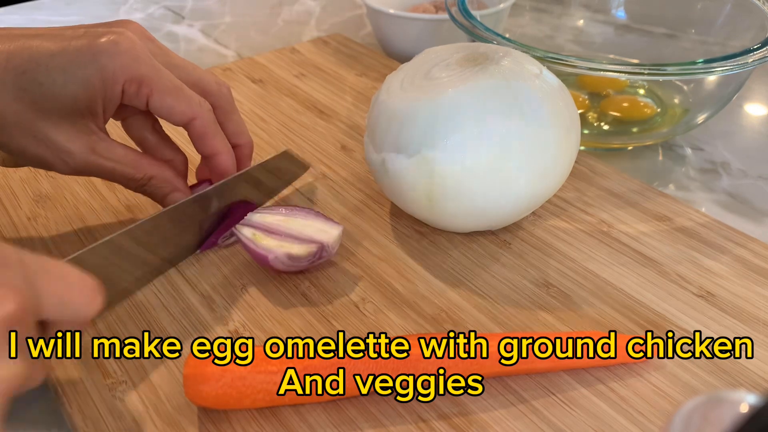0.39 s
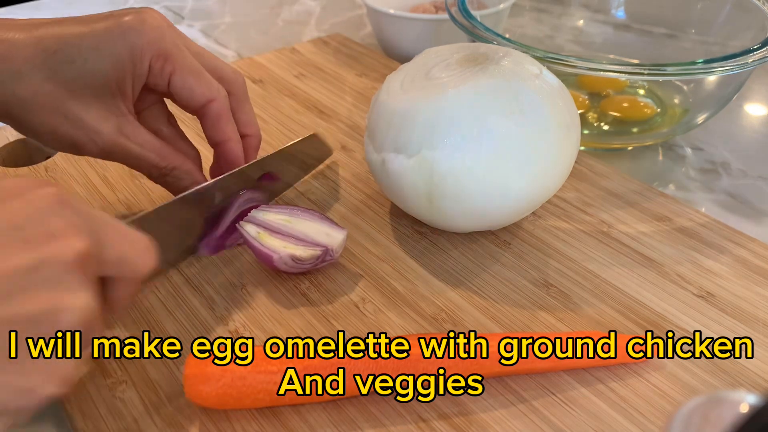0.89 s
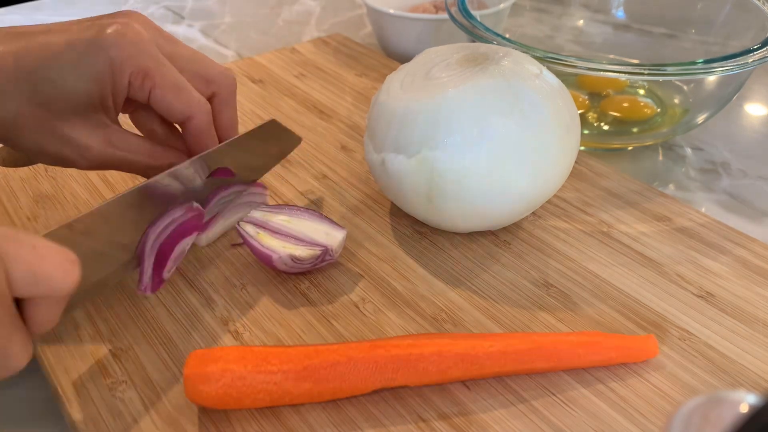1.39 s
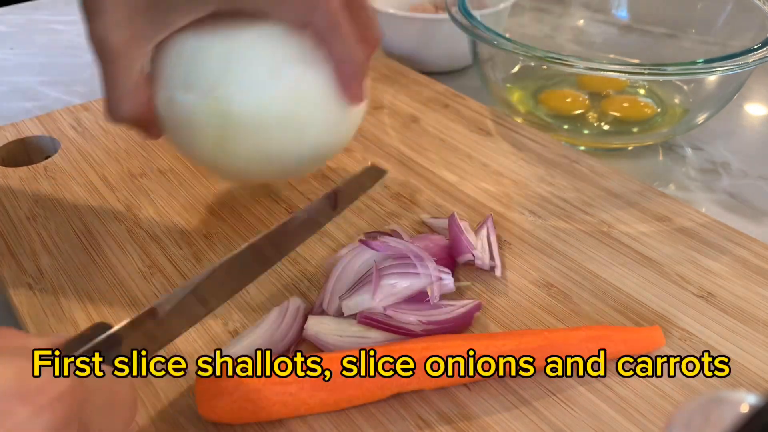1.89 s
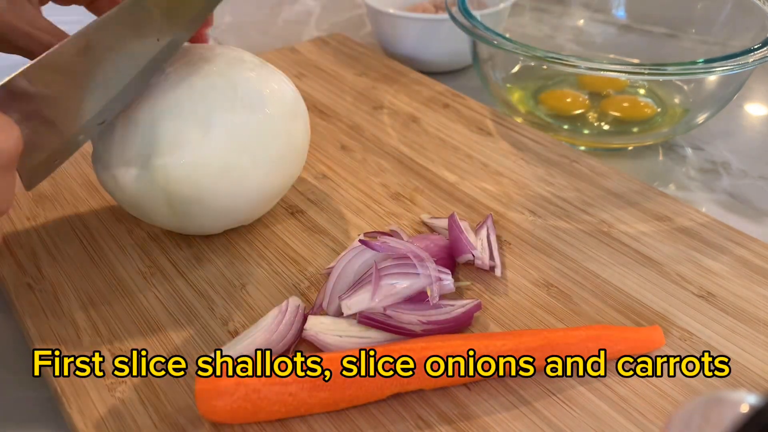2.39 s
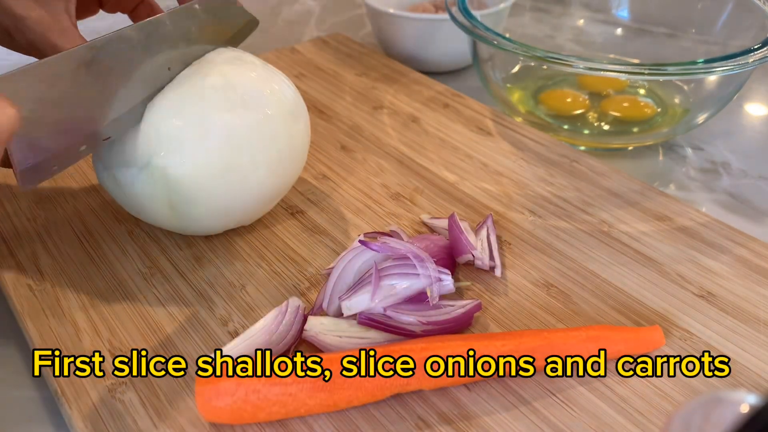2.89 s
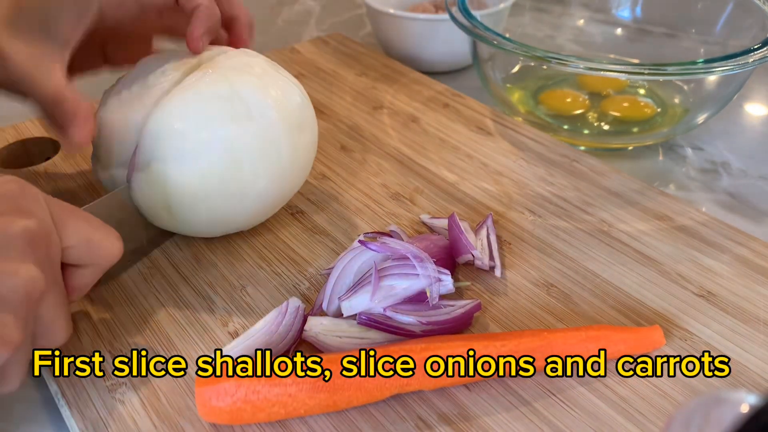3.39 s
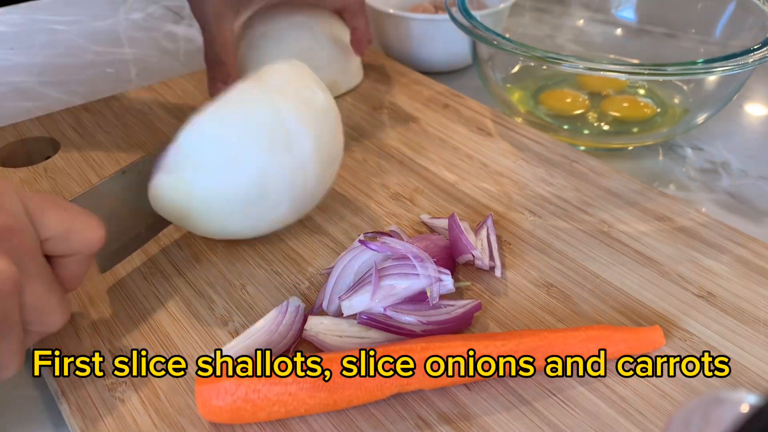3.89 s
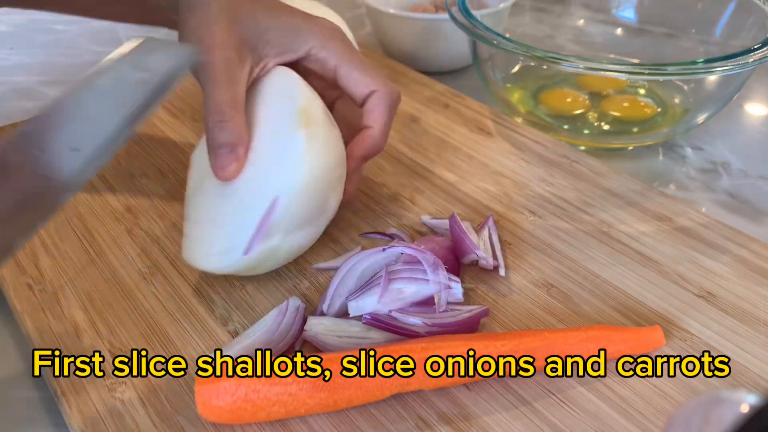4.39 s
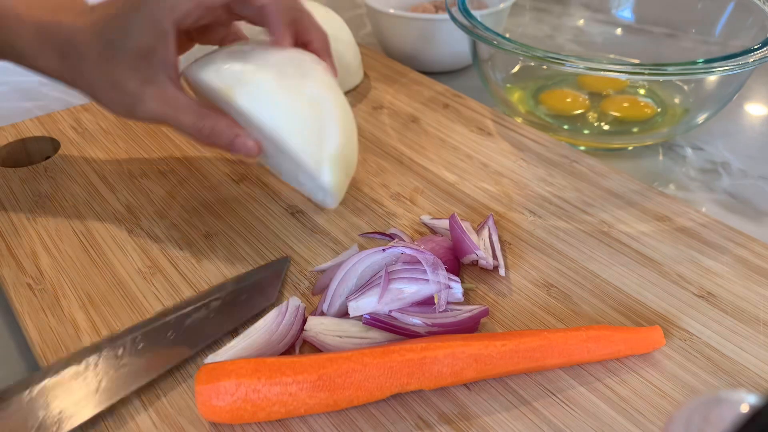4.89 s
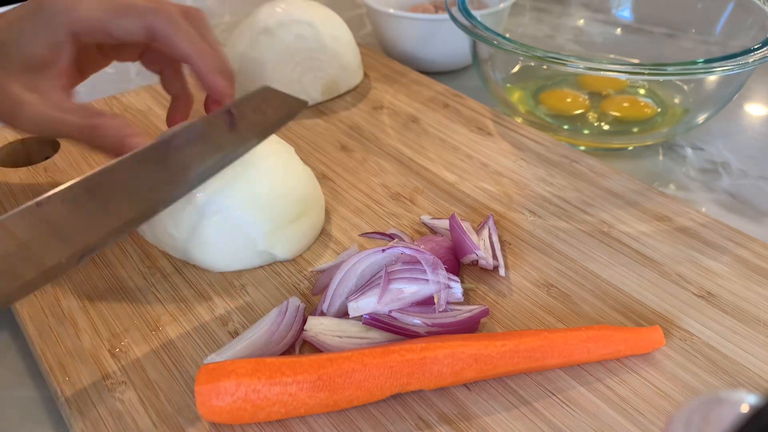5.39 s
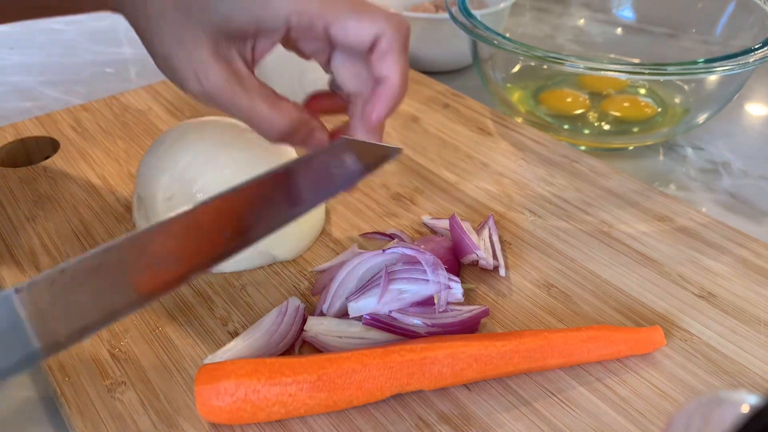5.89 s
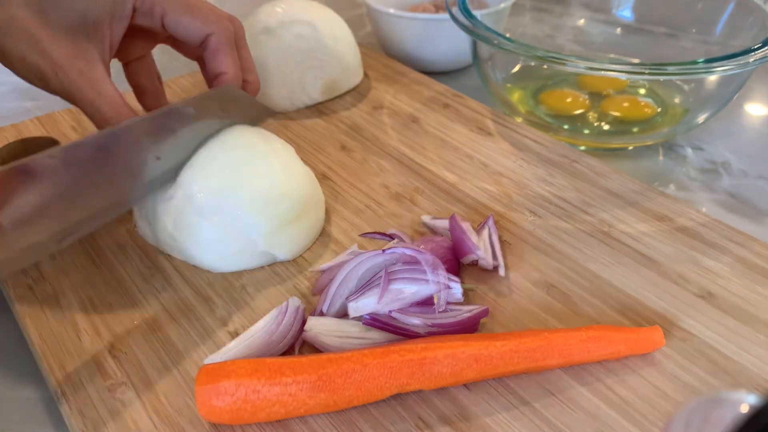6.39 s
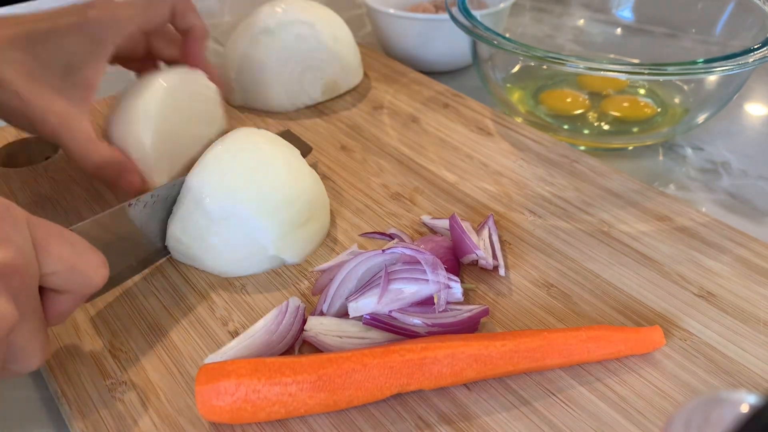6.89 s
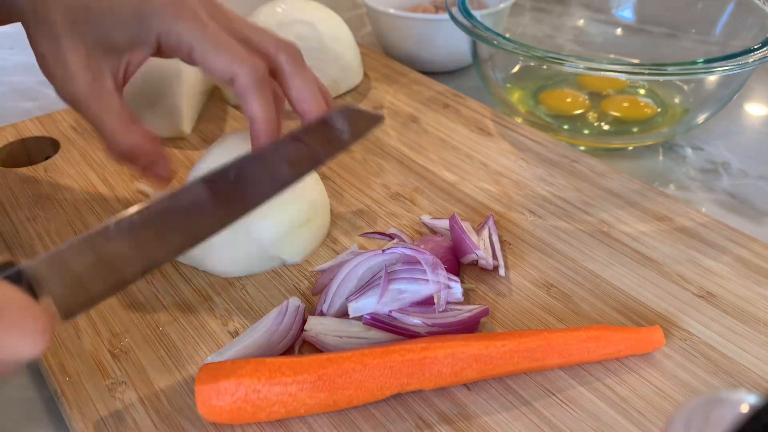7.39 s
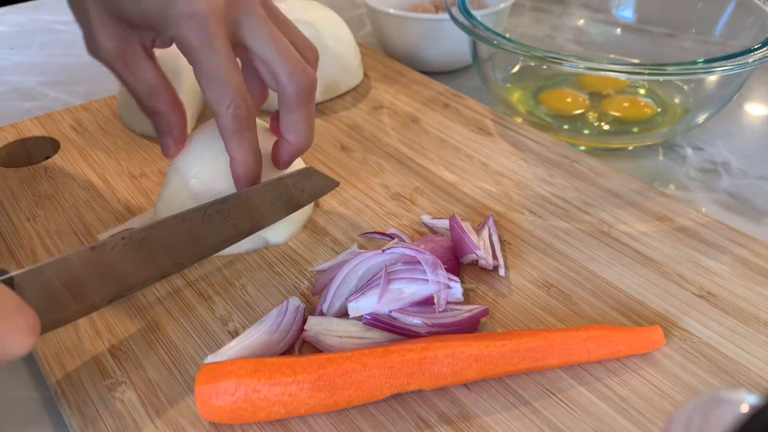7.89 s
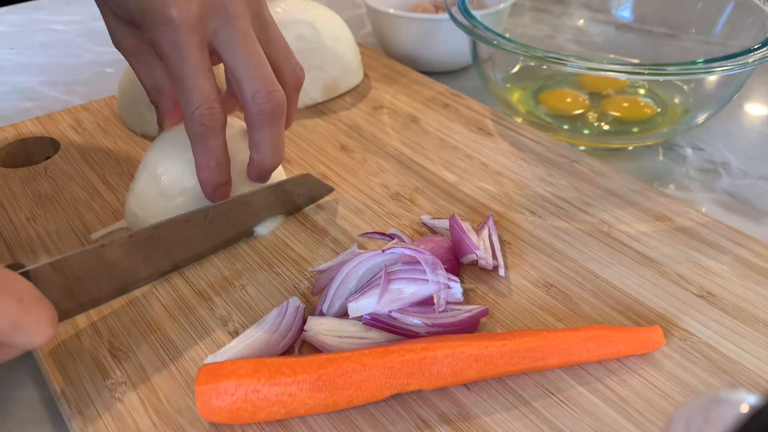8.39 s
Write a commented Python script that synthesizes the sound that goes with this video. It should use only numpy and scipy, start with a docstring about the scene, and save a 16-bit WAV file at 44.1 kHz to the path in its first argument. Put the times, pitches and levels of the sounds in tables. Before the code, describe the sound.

Close stereo sound of a knife on a bamboo board in a hard-walled kitchen, starting in the tail of an earlier knock. From 0.3 to 1.3 s, crisp wet slices end in woody knocks at about 0.43, 0.8 and 1.2 s, each followed by a faint blade drag. A soft bump at 1.5 s and a bright rustle at 1.7 s lead into small hisses and snaps until 2.9 s. A longer juicy slice at 3.1 s ends in a strong knock at 3.24 s; a duller one lands at 4.0 s. Rustle and clack come near 4.9 s, a low thud at 5.27 s. Around 6.3-6.6 s, crunchy cutting ends in a knock, then faint taps at 7.1 and 7.3 s. Final slices knock at 8.1 and 8.35 s. Faint rumble and drone swell unevenly beneath, stronger near 5.8 and 7.1 s.

```python
"""In a hard-walled kitchen a steel knife slices shallots and an onion on a bamboo board.
Wet layers hiss and crunch: shaped noise under envelopes of slides and of short hisses, snaps and rustles.
The edge then knocks and drags on the board, whose damped modes ring; decaying noise is the room's answer.
Low bumps are short decaying sines, and one soft swell is band noise.
Behind, resonant noise makes a rumble and a drone that swell and sink, with air noise, thin whistle and faint hum."""
import sys
import numpy as np
from scipy import signal
from scipy.fft import rfft, irfft
from scipy.io import wavfile

SR = 44100
rng = np.random.default_rng(int(sys.argv[2]) if len(sys.argv) > 2 else 0)


def master_out(mix):
    """Clip the mix to full scale and print it as 16-bit PCM to the path in sys.argv[1]."""
    frames = np.transpose(np.atleast_2d(mix))
    ceiling = np.clip(frames, -1, 1)
    pcm = np.round(ceiling * 32767).astype(np.int16)
    wavfile.write(sys.argv[1], SR, pcm)


def invert_db(x):
    """Field ratio 10**(x/20) for x, a level in decibels (scalar or array-like)."""
    u = np.asarray(x, float) / 20
    return 10 ** u


N = 376173   # samples

# swelling background: (time [s], rumble level [dB], drone level before its resonance levels [dB])
BACKGROUND_SWELLS = [(0, -52, -45), (0.3, -79, -61), (0.7, -61, -54.5), (1.3, -65, -64.5), (1.45, -58, -44),
                     (1.6, -63.5, -61), (2.3, -68.5, -68), (2.45, -66.5, -50.5), (3.1, -62.5, -69),
                     (3.6, -85, -66), (3.82, -70.5, -70.5), (3.86, -56, -44.5), (3.95, -63, -62),
                     (4.5, -83, -75.5), (4.7, -59.5, -51), (5.15, -69.5, -64), (5.8, -51, -48),
                     (6.3, -62, -66.5), (7.1, -53, -47), (7.75, -53.5, -52), (8.0, -59, -60),
                     (8.53, -71, -77)]
# resonances of the drone: (frequency [Hz], width of one filter pass [Hz], relative level [dB])
DRONE_RESONANCES = [(132.3, 62, 3), (215, 85, -0.5), (293, 130, -5), (357.8, 21, -4.5)]
# relative spectrum of the air noise: (frequency [Hz], level [dB])
AIR_SPECTRUM = [(25, -10.5), (60, -2), (300, -14.5), (700, -18), (2000, -34.5), (7000, -45), (16000, -52.5)]
# centres of the faint hum: (frequency [Hz])
HUM_CENTRES = [525.5, 600]
HUM_DB, STILL_AIR_DB = -70, -70
WHISTLE_HZ, RUMBLE_HZ = 7300, 65.6

# the edge slides through a vegetable or is drawn back:
# (start [s], length [s], hiss level at start [dB], hiss level at end [dB], crunch over hiss [dB])
SLICING_SLIDES = [(0.0, 0.18, -53, -85.5, -26), (0.331, 0.09, -43, -35.5, -10),
                  (0.626, 0.05, -48.5, -44, -7.5), (0.698, 0.1, -38.5, -42, -8),
                  (1.128, 0.059, -40.5, -41, -6.5), (3.066, 0.15, -40.5, -39.5, -10.5),
                  (3.992, 0.15, -53, -70.5, -15.5), (4.123, .06, -61, -60.5, -5.5),
                  (6.265, 0.055, -60, -57, -12.5), (6.397, 0.185, -43.5, -42, -6),
                  (8.048, .054, -42, -36.5, -11.5)]
# short hisses, snaps and rustles, some of them with a knock of the blade:
# (peak time [s], hiss level [dB], rise [s], t60 [s], crunch over hiss [dB])
SHORT_HISSES = [(0.264, -57.5, 0.0048, 0.22, -6.5), (0.938, -51, 0.014, 0.16, -5),
                (1.088, -37.5, 0.0073, 0.11, -11), (1.479, -48.5, 0.013, 0.072, -3),
                (1.552, -44.5, 0.016, 0.014, -7), (1.69, -33.5, 0.021, 0.28, -12),
                (2.026, -57.5, 0.0025, 0.094, -15), (2.16, -61, 0.0188, 0.3, -7.5),
                (2.597, -49.5, 0.011, .4, -3.5), (2.764, -50, 0.019, 0.094, -5),
                (2.839, -45.5, 0.043, 0.27, -4.5), (2.932, -39.5, 0.011, 0.1, -9),
                (3.242, -32, 0.017, 0.039, -3.5), (3.742, -60, 0.011, .15, 0),
                (3.829, -59.5, 0.027, 0.27, 0), (4.616, -41, 0.028, 0.2, -10),
                (4.877, -31.5, 0.0068, 0.09, -7.5), (5.276, -47.5, 0.0099, 0.048, -8),
                (6.202, -54, 0.0062, .1, -10), (6.327, -32.5, 0.012, 0.029, -3.5),
                (6.389, -35, 0.0089, 0.11, -0.5), (6.602, -32, .012, 0.023, 0),
                (7.945, -55, 0.01, 0.12, -12), (8.341, -46, 0.013, 0.082, 8)]
# relative spectra of hiss and crunch: (frequency [Hz], level [dB])
HISS_SPECTRUM = [(2500, -40.5), (4000, -25), (6000, -4.5), (8500, -8.5), (10300, 3.5), (11800, -7.5),
                 (13200, 3), (15300, -10.5), (16400, -29)]
CRUNCH_SPECTRUM = [(200, -45), (450, -13), (1100, -13.5), (2200, -13.5), (5000, -18), (8000, -40)]
BITE_S, LET_GO_T60_S = 0.016, 0.12   # a slide bites quickly and dies once the edge stops
RISE_DB = 18   # how far below its peak a sound is one rise time ahead of it
FIZZ_DB, FIZZ_T60_S = -24.5, 1   # the wet cut faces fizz on faintly; level over the end of the hiss

# modes of board and blade together: (frequency [Hz], relative level [dB], t60 [s])
BOARD_MODES = [(340, -15, 0.032), (429.7, 3.5, 0.048), (534, -1, 0.048), (699, -3.5, 0.046),
               (964.2, -3, 0.073), (1080, -1, 0.03), (1537, -3, 0.035), (2034, 1, 0.03),
               (2419, -3.5, 0.025), (3003, -6.5, 0.019), (3400, -8.5, 0.016), (4630, -14.5, 0.0082)]
# centres of thud, knock and clack: (frequency [Hz])
KNOCK_CENTRES = [430, 1000, 2300]
# how strongly slicing shakes the modes at these centres: (level over the crunch [dB])
RUB_LEVELS = (-2, -11.5, -10.5)
# knocks on the board: (time [s], low thud level [dB], middle knock level [dB], high clack level [dB],
# splitting just before, over the knock [dB])
BOARD_KNOCKS = [(0.429, -22, -26, -16, -4), (0.440, -28, -26.5, -20, -8), (0.8, -14.5, -13, -18, -22),
                (1.087, -33, -42.5, -47, -12.5), (1.202, -17.5, -20.5, -12.5, -11.5),
                (3.244, -19, -15, -23, 1), (4.006, -17, -19, -40, -4.5), (4.875, -43, -29, -20.5, -1.5),
                (5.274, -13, -46, -44, -15.5), (6.326, -41, -36.5, -38.5, -10),
                (6.387, -29.5, -45, -49, -10.5), (6.605, -23, -15, -17, -10.5),
                (7.063, -36.5, -60, -62.5, -7.5), (7.285, -48.5, -31, -41.5, -13.5),
                (8.109, -22.5, -18.5, -25.5, -19), (8.338, -31, -46, -19.5, -6),
                (8.347, -27.5, -25, -18.5, 2)]
# an earlier knock, of which only the room tail is heard:
# (thud level [dB], knock level [dB], clack level [dB], splitting over the knock [dB])
EARLIER_KNOCK_LEVELS = (-8.5, -10.5, -11.5, -34)
EARLIER_KNOCK_S = -0.06
LEAD = SR // 10   # samples ahead of time zero, room for the earlier knock
SIDEWAYS_RING = 0.28   # towards the walls many more modes radiate: share of each t60 that is left

# reverberation bands: (centre [Hz], level [dB], t60 [s])
ROOM_BANDS = [(504, -10.5, 0.45), (1000, -7.5, 0.43), (1980, -12, 0.61), (3900, -10.5, 0.49),
              (9000, -23, .12)]
# left port over right port: (frequency [Hz], level [dB])
PORT_DIFFERENCE = [(300, -0.5), (600, 0.5), (1200, 12), (2300, 12), (5000, 1.5), (9000, 4.5)]
RIGHT_LAG = 11   # samples; the knife is nearer the left port

# the blade is dragged back along the board after a knock:
# (start [s], length [s], middle modes level [dB], high modes level [dB])
BLADE_DRAGS = [(0.461, .17, -43, -48), (0.827, 0.14, -46, -54.5), (1.236, 0.2, -44, -43),
               (3.269, 0.17, -42.5, -45.5), (4.009, 0.1145, -48, -69), (4.878, 0.071, -57, -60),
               (6.624, 0.14, -46, -59.5), (8.134, 0.051, -44, -61), (8.367, 0.15, -46.5, -45.5)]
DRAG_FADE_DB, DRAG_EDGE_S = -9.5, 0.015
# soft low bumps of hands and vegetables on the board: (time [s], level [dB], frequency [Hz])
LOW_BUMPS = [(1.532, -33.5, 110), (3.088, -35, 132), (3.857, -34, 151)]
BUMP_CYCLES = 4.8   # t60 in cycles
# soft middle-range noise swells: (time of the top [s], half length [s], level [dB])
NOISE_SWELLS = [(5.938, 0.11, -64)]


def rms_one(x):
    """Normalisation: mean power is brought to one."""
    return x / np.sqrt(np.mean(x ** 2) + 1e-20)


def at_hz(points, hz):
    """Interpolation of levels along a logarithmic frequency axis."""
    table = np.array(points)
    return np.interp(np.log(hz), np.log(table[:, 0]), table[:, 1])


def in_time(rows):
    """Linear interpolation in time: one sample-rate curve per column."""
    s, *columns = np.transpose(rows)
    return [np.interp(np.arange(N) / SR, s, column) for column in columns]


def coloured(white, spectrum):
    """Linear filtering: each Fourier component is weighted by the spectrum."""
    size = white.shape[-1]
    hz = np.maximum(np.arange(size // 2 + 1) * SR / size, 1)
    return irfft(rfft(white) * invert_db(at_hz(spectrum, hz)), size)


def drift(rate):
    """Slow random modulation: normal values, rate per second, joined by straight lines."""
    count = int(N / SR * rate) + 2
    return np.interp(np.arange(N), np.linspace(0, N, count), rng.standard_normal(count))


def pair(alike):
    """Partial coherence: mid and side noise mixed to a given left-right correlation."""
    mid, side = rng.standard_normal((2, N))
    alike = np.clip(alike, 0, 1)
    return np.sqrt(1 + alike) * mid + np.sqrt(1 - alike) * side * np.array([[1], [-1]])


def narrow(x, hz, width_hz):
    """Resonance: noise passes twice through one two-pole filter and leaves with rms 1."""
    r = np.exp(-np.pi * width_hz / SR)
    a = [1, -2 * r * np.cos(2 * np.pi * hz / SR), r * r]
    once = signal.lfilter([1, 0, -1], a, x)
    return rms_one(signal.lfilter([1, 0, -1], a, once))


def background(waver_db, air_db, whistle_db):
    """Resonant noise: rumble and drone swell, air and whistle follow the drone, a faint hum stays."""
    rumble_db, drone_db = in_time(BACKGROUND_SWELLS)
    rumble = invert_db(rumble_db + waver_db * drift(12.0)) * narrow(pair(1.0), RUMBLE_HZ, 25.0)
    drone = sum(invert_db(drone_db + db - 7.0 + waver_db * drift(7.1)) * narrow(pair(0.92), hz, width_hz)
                for hz, width_hz, db in DRONE_RESONANCES)
    air_level = invert_db(drone_db + air_db + waver_db * drift(11)) + invert_db(STILL_AIR_DB)
    air = air_level * rms_one(coloured(pair(0.26), AIR_SPECTRUM))
    whistle_level = invert_db(drone_db + whistle_db + waver_db * drift(9.1))
    whistle = whistle_level * narrow(pair(0.94), WHISTLE_HZ, 600.0)
    hum = sum(invert_db(HUM_DB + waver_db * drift(4.9)) * narrow(pair(0.23), hz, 25.0) for hz in HUM_CENTRES)
    return rumble + drone + air + whistle + hum


def effort():
    """Addition of powers: slides and short hisses rise, hold and die; gives hiss and crunch envelopes."""
    shapes = []
    for s, length, db, end_db, crunch_db in SLICING_SLIDES:
        shapes.append((s + BITE_S, max(length - BITE_S, 0), db, end_db, BITE_S, LET_GO_T60_S, crunch_db))
    for s, db, rise, t60, crunch_db in SHORT_HISSES:
        shapes.append((s, 0, db, db, rise, t60, crunch_db))   # no hold
    hiss, crunch, t = np.zeros(N), np.zeros(N), np.arange(N) / SR
    for s, hold, db, end_db, rise, t60, crunch_db in shapes:
        stop = s + hold
        span = slice(max(int((s - 2 * rise) * SR), 0), int((stop + FIZZ_T60_S) * SR))
        now = t[span]
        corners = [s - rise, s, stop + 1e-6, stop + t60]
        level_db = np.interp(now, corners, [db, db, end_db, end_db - 60], right=-200)
        rise_db = -RISE_DB * (np.minimum(now - s, 0) / rise) ** 2   # a rounded rise
        power = invert_db(level_db) ** 2 * invert_db(rise_db) ** 2
        since = now - s - hold
        fizz = (since > 0) * invert_db(end_db + FIZZ_DB - 60 * since / FIZZ_T60_S) ** 2
        hiss[span] += power + fizz
        crunch[span] += power * invert_db(crunch_db) ** 2
    return np.sqrt(hiss), np.sqrt(crunch)


def rubbed(loudness, rough_db):
    """Friction drive: rough noise excites every damped board mode under its envelope loudness(hz)."""
    out = 0
    for hz, level_db, t60 in BOARD_MODES:
        r, w = invert_db(-60 / (t60 * SR)), 2 * np.pi * hz / SR
        grit = rng.standard_normal(N) * invert_db(rough_db * drift(45)) * loudness(hz) + 1e-18
        gain = np.sin(w) * np.sqrt(1 - r * r)   # offsets the build-up of noise in long modes
        out = out + signal.lfilter([0, gain], [1, -2 * r * np.cos(w), r * r], grit) * invert_db(level_db)
    return out


def strokes(grain_db, flutter_db, pop_db, pops_per_s):
    """Fracture noise: cells burst under the edge as grainy hiss, pops and duller crunch; the board is rubbed."""
    hiss, crunch = effort()
    layers = invert_db(flutter_db * (0.15 * drift(30) + drift(110)))   # layer after layer gives way
    bursts = rng.random(N) < pops_per_s / SR
    pops = bursts * invert_db(pop_db + 4.0 * rng.standard_normal(N)) * rng.choice([-1, 1], N)
    grains = pair(0.2) * invert_db(grain_db * drift(1500)) + pops   # partly its own on each side
    tears = rng.standard_normal(N) * invert_db(grain_db * drift(400) + flutter_db * drift(60)) + pops

    def shaking(hz):
        """Coupling: the share of the crunch that reaches a mode."""
        return crunch * layers * invert_db(np.interp(np.log(hz), np.log(KNOCK_CENTRES), RUB_LEVELS))

    wood = rubbed(shaking, rough_db=4.0)
    wet_hiss = hiss * layers * rms_one(coloured(grains, HISS_SPECTRUM))
    dull_crunch = crunch * layers * rms_one(coloured(tears, CRUNCH_SPECTRUM))
    return wet_hiss, dull_crunch + wood


def ports(x):
    """Level and time difference: the left port faces the knife, louder in the middle range and earlier."""
    left = coloured(x, [(hz, db / 2) for hz, db in PORT_DIFFERENCE])
    right = coloured(x, [(hz, -db / 2) for hz, db in PORT_DIFFERENCE])
    return np.array([left, np.concatenate([np.zeros(RIGHT_LAG), right[:-RIGHT_LAG]])])


def kitchen(x):
    """Reverberation: bands of dying noise, independent on each side, building up after 6 ms."""
    t = np.arange(int(0.8 * SR)) / SR
    response = 0
    for hz, level_db, t60 in ROOM_BANDS:
        # octave bands; the top one reaches higher
        edges = [hz / 1.414, min(hz * 1.414 * (1 + (hz > 6000)), 0.4 * SR)]
        octave = signal.butter(2, edges, "band", fs=SR, output="sos")
        band = signal.sosfilt(octave, rng.standard_normal((2, len(t))))
        decay = invert_db(-60 * t / t60) * np.clip((t - 0.006) / 0.0018, 0, 1)
        response = response + invert_db(level_db) * band * decay / np.sqrt(np.sum(decay ** 2))
    return signal.fftconvolve(x[None], response, axes=1)[:, :len(x)]


def knocks(spread_db, contact_s, snap_db, split_s, after_db):
    """Impact on modes: the last layer splits, then the edge lands heel to tip in quick contacts with a snap."""
    rows = np.array([(EARLIER_KNOCK_S, *EARLIER_KNOCK_LEVELS)] + list(BOARD_KNOCKS))
    at = LEAD + np.round(rows[:, 0] * SR).astype(int)
    # axes: knock, mode, (level, sign, delay), contact
    chance = rng.standard_normal((len(rows), len(BOARD_MODES), 3, 3))
    out = np.zeros((2, N + LEAD))
    before = np.arange(1, LEAD // 3)
    growth = np.exp(-(before / (split_s * SR)) ** 2)
    splitting = rng.standard_normal((len(rows), len(before))) * growth / np.sqrt(split_s * SR)
    for k, (hz, level_db, t60) in enumerate(BOARD_MODES):
        colour_db = np.array([np.interp(np.log(hz), np.log(KNOCK_CENTRES), row[1:4]) for row in rows])
        strength = invert_db(colour_db + level_db)[:, None]
        late = (contact_s * SR * np.abs(chance[:, k, 2]) * [0, 1, 2]).astype(int)
        contacts = strength * invert_db(spread_db * chance[:, k, 0] + after_db * np.arange(3))
        # at first contact neighbouring modes start opposed
        sign = np.sign(chance[:, k, 1] + [9 * (-1) ** k, 0, 0])
        drive = np.zeros(N + LEAD) + 1e-18
        np.add.at(drive, at[:, None] - before, strength * invert_db(rows[:, 4:]) * splitting)
        np.add.at(drive, at[:, None] + late, contacts * sign)
        for way, share in enumerate((1, SIDEWAYS_RING)):   # to the microphone, to the walls
            r, w = invert_db(-60 / (share * t60 * SR)), 2 * np.pi * hz / SR
            ringing = signal.lfilter([0, np.sin(w)], [1, -2 * r * np.cos(w), r * r], drive)
            out[way] += ringing / np.sqrt(share)
    kicks = np.zeros(N + LEAD) + 1e-18
    kicks[at] = invert_db(rows[:, 3] + snap_db)
    snap = signal.lfilter([1], [1, -np.exp(-1 / (0.0018 * SR))], kicks)   # time constant 1.8 ms
    out += snap * rms_one(coloured(rng.standard_normal(N + LEAD), CRUNCH_SPECTRUM))
    # a small board radiates no bass
    return signal.sosfilt(signal.butter(4, 290, "high", fs=SR, output="sos"), out)


def drags(thud_db):
    """Sliding friction: each drag comes in, fades a little and lifts off while the modes ring."""
    t, levels = np.arange(N) / SR, np.zeros((2, N))
    for s, length, *db in BLADE_DRAGS:
        edges = np.clip(np.minimum(t - s, s + length - t) / DRAG_EDGE_S + 1, 0, 1)
        fade = invert_db(DRAG_FADE_DB * np.clip((t - s) / length, 0, 1))
        levels += invert_db(np.array(db))[:, None] * (edges * fade)

    def loudness(hz):
        """Modal weighting: middle or high curve, with the lower modes changed by thud_db."""
        thud = invert_db(thud_db) if hz < KNOCK_CENTRES[1] * 0.8 else 1
        return levels[int(hz > KNOCK_CENTRES[1] * 1.3)] * thud

    return rubbed(loudness, rough_db=3.5)


def bumps():
    """Damped free oscillation: each bump is a short low sine that dies exponentially."""
    out = np.zeros(N)
    for s, db, hz in LOW_BUMPS:
        turns = np.arange(SR // 10) / SR * hz
        start = int(s * SR)
        out[start:start + len(turns)] += invert_db(db - 60 * turns / BUMP_CYCLES) * np.sin(2 * np.pi * turns)
    return out


def swells():
    """Amplitude modulation: broad middle-range noise rises and sinks on a bell curve."""
    t = np.arange(N) / SR
    envelope = sum(invert_db(db) * np.exp(-((t - s) / half) ** 2) for s, half, db in NOISE_SWELLS)
    return envelope * narrow(pair(0.2), 1080.0, 1000.0)


def scene():
    """Superposition: knife sounds, direct and through the room, add to the background."""
    knife = knocks(spread_db=1.5, contact_s=0.0018, snap_db=-15.0, split_s=0.011, after_db=-6.5)
    hiss, crunch = strokes(grain_db=1.5, flutter_db=2.5, pop_db=15.5, pops_per_s=150.0)
    knife[:, LEAD:] += crunch + drags(thud_db=-9.0)
    hiss = np.array([hiss[0], np.roll(hiss[1], RIGHT_LAG)])
    direct, walls = knife
    near = (ports(direct) + kitchen(walls))[:, LEAD:] + hiss + bumps() + swells()
    return near + background(waver_db=3.5, air_db=-4.5, whistle_db=-28.0)


def low_pass(x):
    """Removes everything above the highest recorded frequency."""
    return signal.sosfilt(signal.butter(12, 16500, fs=SR, output="sos"), x)


def record(dry):
    """Linearity: the superposed sounds are the finished mix, with no further gain."""
    return low_pass(dry)


dry = scene()
out = record(dry)
master_out(out)
```